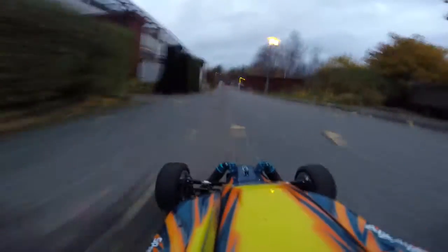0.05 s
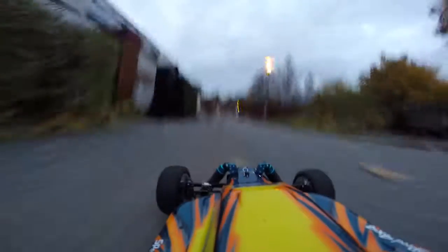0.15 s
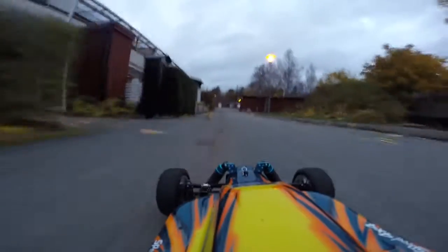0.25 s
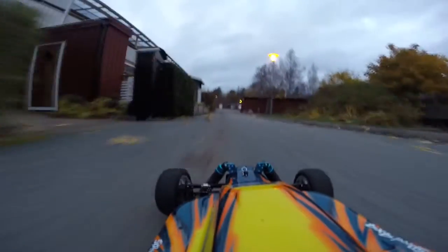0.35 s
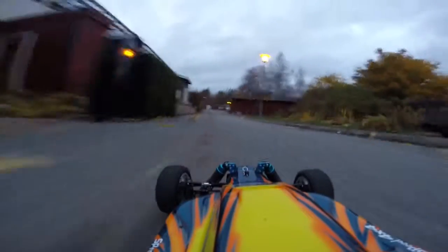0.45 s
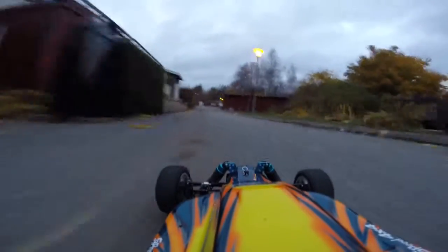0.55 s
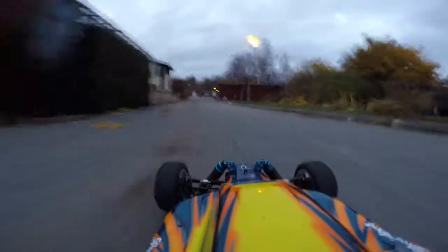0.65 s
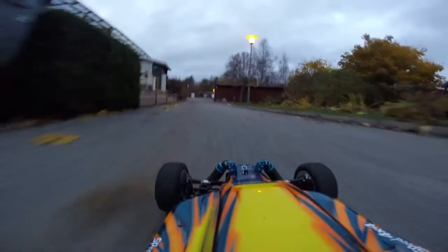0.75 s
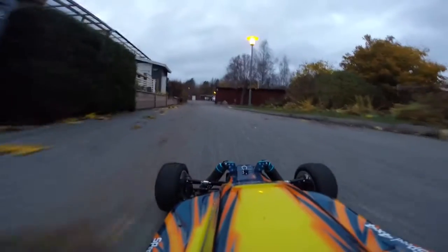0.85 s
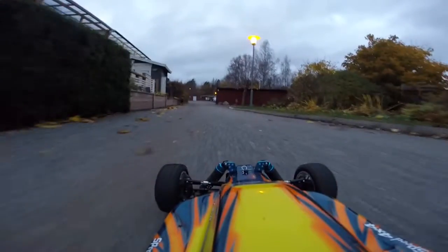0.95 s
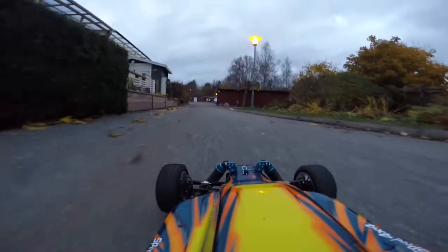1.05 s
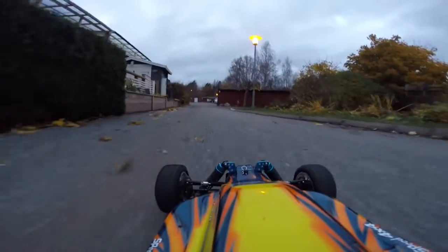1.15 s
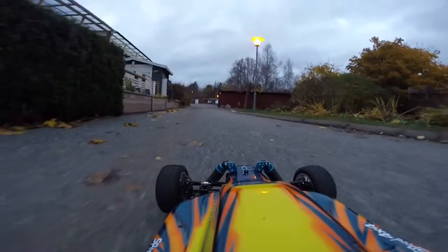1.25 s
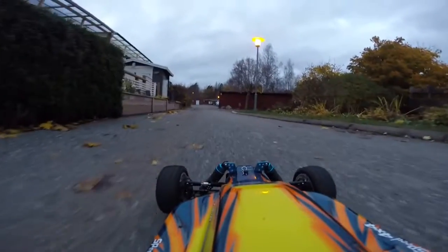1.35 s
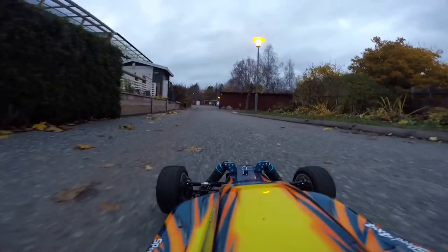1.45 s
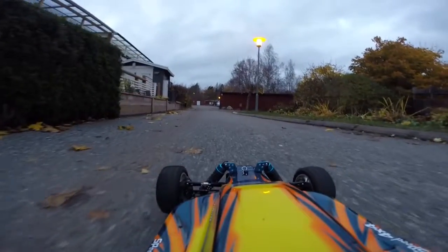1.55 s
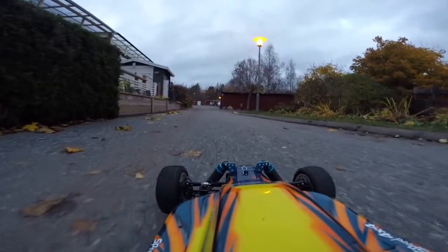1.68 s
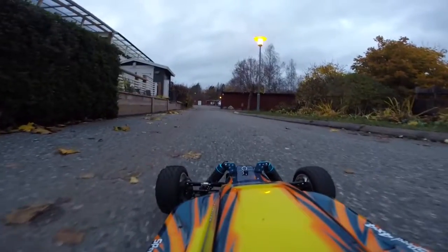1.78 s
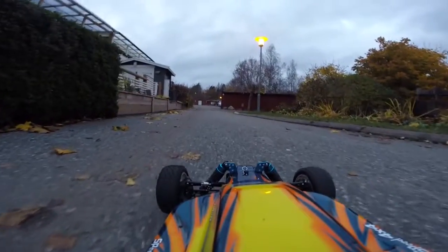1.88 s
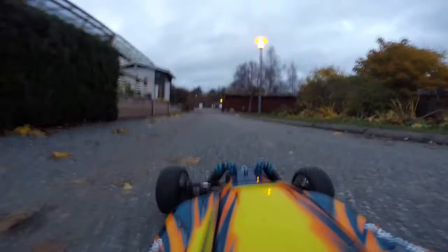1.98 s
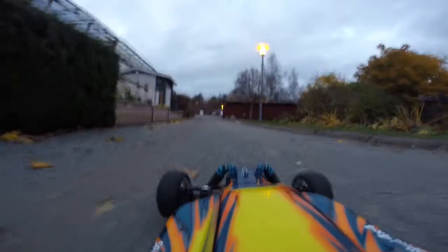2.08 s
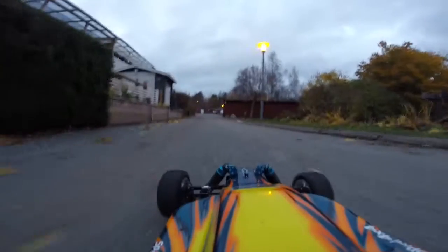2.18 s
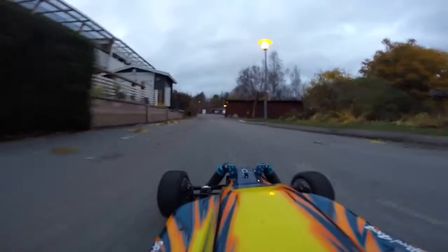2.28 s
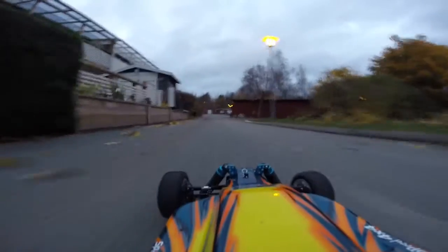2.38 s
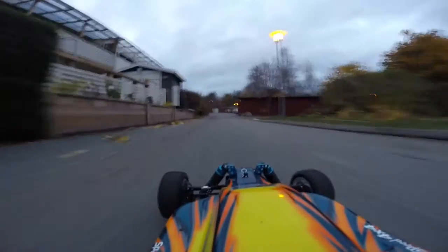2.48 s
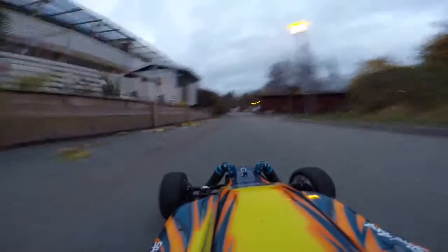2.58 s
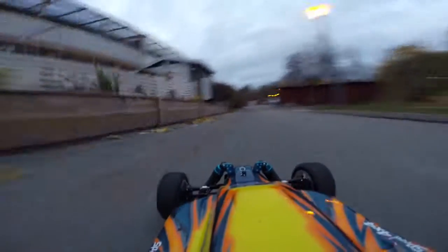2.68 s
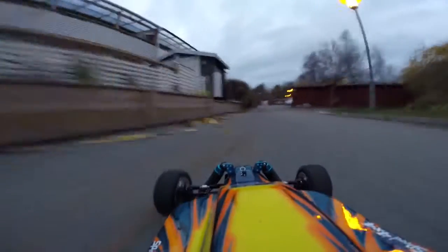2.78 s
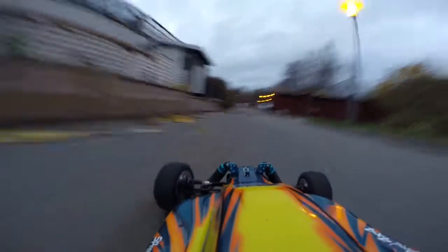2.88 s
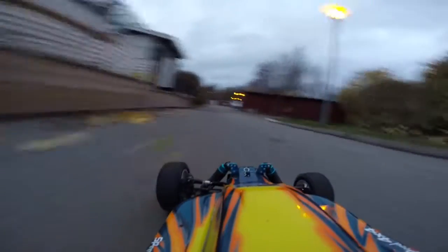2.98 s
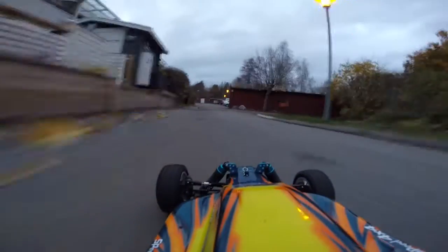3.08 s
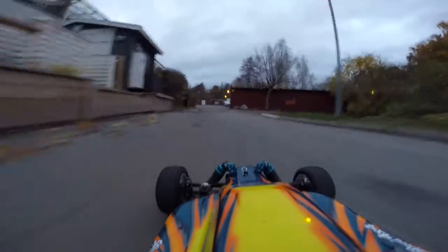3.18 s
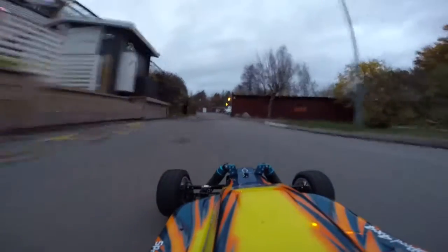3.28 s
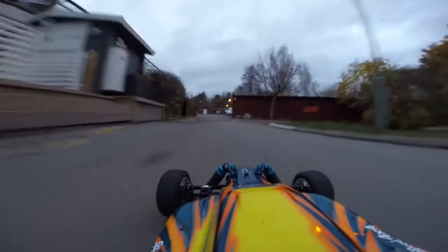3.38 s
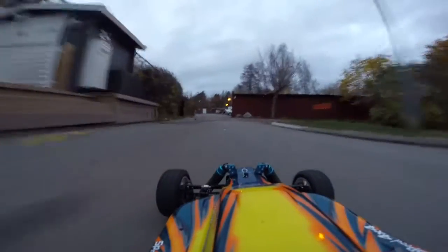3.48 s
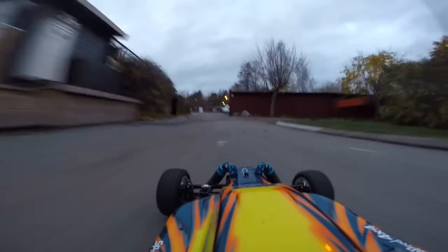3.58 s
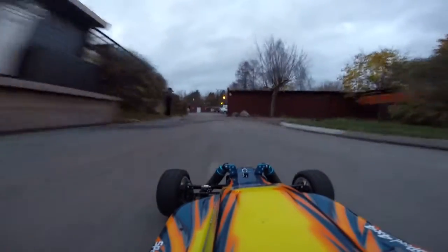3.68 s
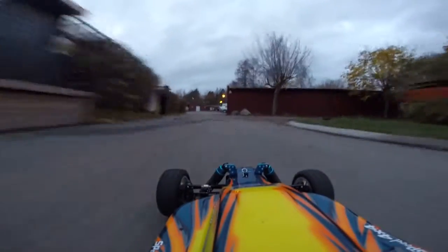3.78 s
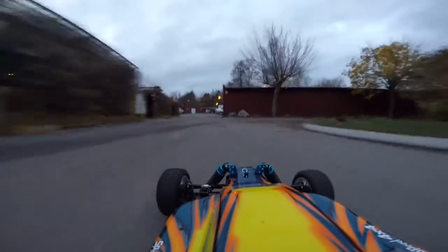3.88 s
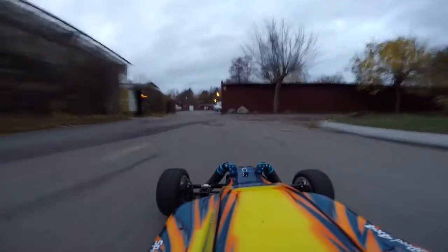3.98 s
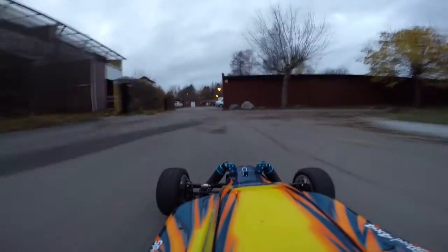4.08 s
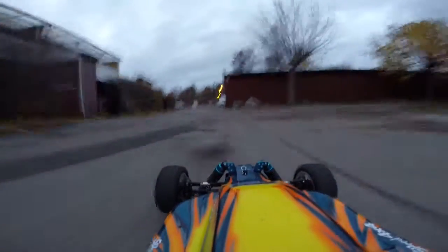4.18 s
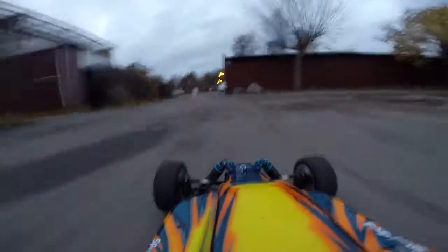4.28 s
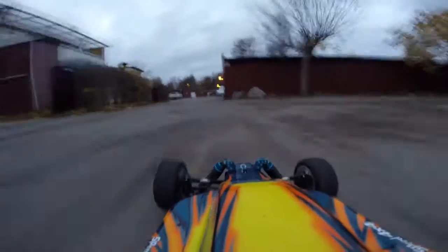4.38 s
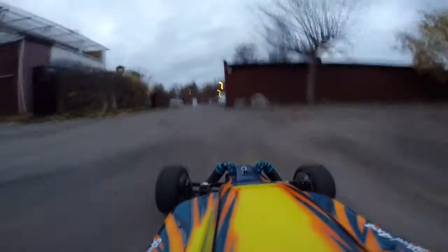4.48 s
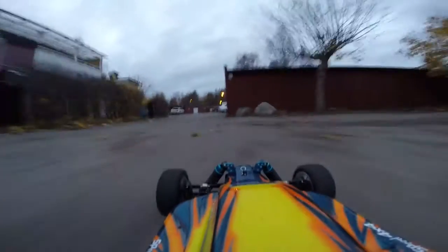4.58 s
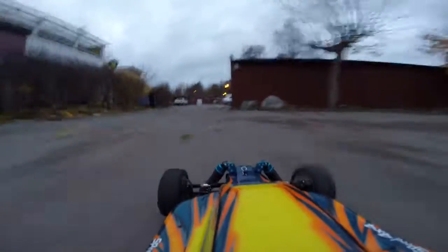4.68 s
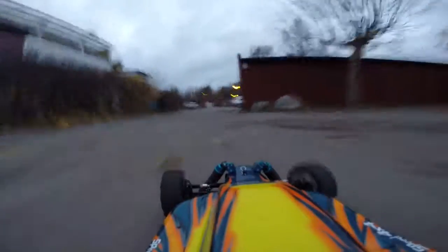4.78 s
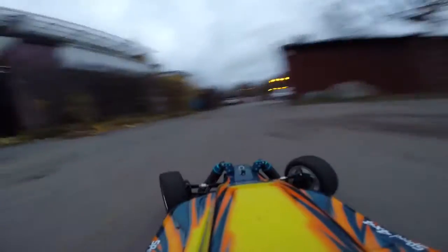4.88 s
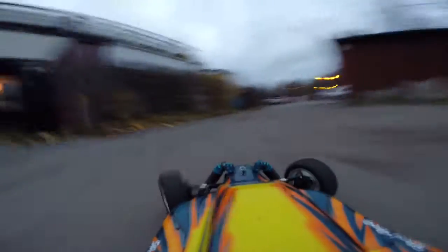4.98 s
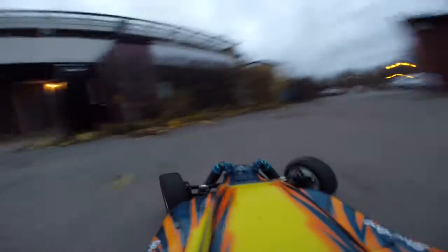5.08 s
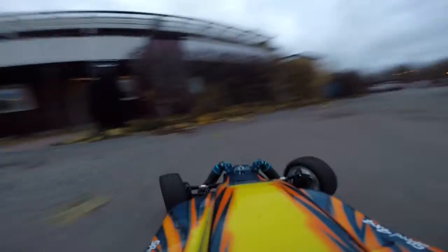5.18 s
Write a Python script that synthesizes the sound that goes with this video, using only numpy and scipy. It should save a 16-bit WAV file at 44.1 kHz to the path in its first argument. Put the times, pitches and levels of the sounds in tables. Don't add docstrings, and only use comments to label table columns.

```python
import sys
import numpy as np
from scipy import signal
from scipy.io import wavfile
from scipy.ndimage import uniform_filter1d, minimum_filter1d

SR = 44100
rng = np.random.default_rng(int(sys.argv[2]) if len(sys.argv) > 2 else 0)


def wrap_up_sound(samples):
    columns = np.atleast_2d(samples).T
    tamed = np.clip(columns, -1, 1)
    steps = np.round(tamed * 32767).astype(np.int16)
    wavfile.write(sys.argv[1], SR, steps)


def rack_gain(trim_db):
    fader = np.asarray(trim_db, float)
    return 10 ** (fader / 20)


N = 231260
T = np.arange(N) / SR

# t/s, chassis shaking level/dB, tyre grit (0-1)
RIDE = [(0, -10.5, 0.75), (.48, -11.5, 0.83), (.62, -12, 0.82), (.8, -15, 0.57), (1.22, -15.5, 0.1),
        (1.3, -27, 0), (1.885, -26, 0.05), (1.895, -14.5, 0.8), (1.94, -8, 0.3), (2.03, -16.5, 0.3),
        (2.12, -17, 0.34), (2.42, -13, .9), (2.65, -14.5, 0.83), (3.3, -13.5, 0.77), (3.8, -11, 0.8),
        (4.4, -11, 0.91), (4.48, -14, 0.85), (5.24, -13, 0.4)]
# t/s, switching tone level/dB, judder hiss level/dB
BRAKES = [
    [(0.54, -53, -18), (0.55, -27, -23), (0.854, -29, -31.5), (1.134, -26.5, -38.5), (1.23, -27.5, -33),
     (1.28, -30, -55)],
    [(4.15, -23, -26), (4.236, -30, -24), (4.412, -28.5, -22.5), (4.43, -41, -24)],
]


def evened(x):
    return x / np.sqrt(np.mean(x ** 2) + 1e-20)


def columns(rows, t):
    s, *cols = np.transpose(rows)
    return [np.interp(t, s, c) for c in cols]


def add(mix, s, sound):
    part = mix[round(s * SR):][:len(sound)]
    part += sound[:len(part)]


def span(rows, fade_s=0.024):
    t = np.arange(rows[0][0], rows[-1][0], 1 / SR)
    to_nearest_end = np.minimum(t - t[0], t[-1] - t)
    return t, np.clip(to_nearest_end / fade_s, 0, 1)


def swells(rows):
    return sum(db * np.exp(-((T - s) / length) ** 2) for s, db, length in rows)


def drift(hz, size=N):
    noise = rng.standard_normal(size + 4000)
    smooth = signal.lfilter(*signal.butter(2, hz, fs=SR), noise)
    return evened(smooth[4000:])


def resonate(x, hz, width):
    turn = np.exp(2j * np.pi * np.cumsum(hz * np.ones(len(x))) / SR)
    r = np.exp(-np.pi * width / SR)
    return 2 * (turn * signal.lfilter([1 - r], [1, -r], x / turn)).real


def causal(points, peaks=()):
    hz = abs(np.fft.fftfreq(8192, 1 / SR))
    f, db = np.transpose(points)
    db = np.interp(np.log(hz + 1), np.log(f + 1), db)
    db = db + sum(d / (1 + (2 * (hz - p) / w) ** 2) for p, w, d in peaks)
    log_level = np.log(rack_gain(np.maximum(db, -130)))
    spectrum = np.exp(np.conj(signal.hilbert(log_level)))
    taps = np.fft.ifft(spectrum).real[:4096] * np.hanning(8192)[4096:]
    return taps / np.linalg.norm(taps)


def whine(hz, db, fuzz=0.32, width=45):
    phase = 2 * np.pi * np.cumsum(hz * np.ones(len(db))) / SR + 6 * rng.random()
    line = np.sqrt(2) * np.sin(phase)
    halo = rng.standard_normal(len(db))
    for _ in range(3):
        halo = resonate(halo, hz, width)
    return rack_gain(db) * ((1 - fuzz) * line + fuzz * evened(halo))


def rumble():
    # f/Hz, level per Hz/dB
    rumble_colour = [(15, -16.5), (23, 7), (33, -7.5), (50, -6), (100, -8.5), (160, -10), (300, -16),
                     (500, -26.5), (1000, -67), (4000, -120)]
    # t/s, swell/dB, length/s
    bumps = [
        (.57, 12.5, 0.02),
        (1.6, 1, 0.061),
        (1.97, 20.5, 0.091),
        (2.98, 6, 0.18),
        (3.2, 4, 0.074),
        (4.29, 5, 0.016),
        (4.95, 11, 0.18),
        (5.22, 11, 0.15),
    ]
    grit = columns(RIDE, T)[1]
    level_db = -32 + 6.5 * (grit - 0.95) + swells(bumps)
    lumps = rng.standard_normal(N) * rack_gain(2.9 * drift(42))
    return rack_gain(level_db) * evened(signal.oaconvolve(lumps, causal(rumble_colour))[:N])


def hum():
    # t/s, level/dB
    fan_levels = [
        (.7, -47),
        (.9, -36.5),
        (1.22, -35.5),
        (1.31, -28),
        (1.87, -20),
        (1.91, -21),
        (1.93, -70),
    ]
    # t/s, swell/dB, length/s
    surges = [(.2, 5.5, 0.27), (.5, 5.5, 0.057), (2.05, 16.5, .03), (2.13, 13, 0.042), (2.45, 1, .1),
              (2.8, 8, 0.14), (2.97, 10, 0.076), (3.2, 7.5, 0.086), (3.87, 12, 0.22), (4.53, 13.5, 0.032),
              (4.95, 13, 0.24), (5.23, 17, 0.048)]
    fan_hz = 234.5 * (1 + 0.0026 * drift(8.0))
    fan = whine(fan_hz, columns(fan_levels, T)[0], fuzz=0.07, width=8.7)
    grit = columns(RIDE, T)[1]
    tray_db = -36.5 + 6.5 * (grit - .7) + swells(surges) + 0.66 * drift(8.1)
    tray_hz = 215 * (1 + 0.0151 * drift(1.907))
    return fan + whine(tray_hz, tray_db, fuzz=0.8, width=52.6)


def creep():
    # f/Hz, width/Hz, level/dB
    bands = [(806, 290, -51), (1565, 190, -37), (2102, 180, -32.5), (2624, 230, -49.5), (4870, 420, -58.5),
             (6140, 900, -62)]
    rock_hz, rock_db, fade_db = 8.6, 4, 1
    out = np.zeros(N)
    t, window = span([[1.26], [1.7]])
    db = rock_db * np.cos(2 * np.pi * rock_hz * (t - 1.42)) + fade_db * (t - t[0]) / (t[-1] - t[0])
    for f, width, band_db in bands:
        level_db = db + band_db + 3.3 * drift(25, len(t))
        add(out, t[0], window * whine(f, level_db, fuzz=0.83, width=width))
    return out


def motor():
    # t/s, f/Hz, level/dB
    shaft = [
        (3.35, 126.7, -38.5),
        (3.6, 155.6, -32.5),
        (3.9, 182.5, -30),
        (4, 182, -52),
    ]
    # start/s, end/s, f/Hz, width/Hz, level/dB
    howls = [
        (0, 0.508, 4910, 500, -38),
        (2.344, 2.465, 5740, 352, -38),
        (3.486, 3.95, 4910, 346, -36.5),
    ]
    # multiple of its pitch, level/dB
    switch_orders = [(1, 1.5), (2, 1.5), (3, -20.5), (4, -31.5), (5, -28)]
    # f/Hz, width/Hz, level/dB
    judder = [(2708, 420, 6), (5440, 1800, -18.5), (7970, 300, -27), (10500, 2000, -47.5)]
    switch_hz = 1016.3
    out = np.zeros(N)
    t, window = span(shaft)
    add(out, t[0], window * whine(*columns(shaft, t), fuzz=0.26, width=29))
    for start, end, hz, width, db in howls:
        t, window = span([[start], [end]], fade_s=0.047)
        add(out, start, window * whine(hz, db + 3.7 * drift(60, len(t)), fuzz=1, width=width))
    for rows in BRAKES:
        t, window = span(rows, fade_s=0.012)
        tone_db, hiss_db = columns(rows, t)
        tone = sum(whine(k * switch_hz, tone_db + db, fuzz=0.22, width=42) for k, db in switch_orders)
        judder_db = hiss_db - 8 + 2.5 * drift(120, len(t))
        hiss = sum(whine(f, judder_db + db, fuzz=0.9, width=w) for f, w, db in judder)
        add(out, t[0], window * (tone + hiss))
    return out


def gears():
    # start/s, end/s, first f/Hz, last f/Hz, bow of the glide/Hz
    stretches = [(0, 0.526, 446.4, 530, 18.5), (2.22, 2.621, 330, 797.7, 110),
                 (2.651, 3.144, 658.5, 549, 49.5), (3.14, 3.969, 575.7, 1197, 271),
                 (3.999, 4.16, 1098, 1135, 15), (4.432, 4.828, 700, 623, 29),
                 (4.79, 5.202, 638, 390, -60.5), (0.548, 1.087, 417, 115.8, -70),
                 (.84, 1.295, 215, 66.3, -65.5), (2.079, 2.442, 172, 616.5, -52),
                 (2.019, 2.248, 104.8, 362.3, 3)]
    multiples = [(1, 2, 3, 4.9), (1, 2, 3.3), (1, 2, 3), (1, 2, 4.9), (1, 2), (1, 2, 3), (1, 2, 3),
                 (2, 4.9), (9.8, 14.7), (4.9,), (1, 2)]
    order_db = [(-3, -0.5, -5, -1), (1, 0, -7.5), (-8.5, -0.5, -7.5), (-0.4, -4, 6), (-2.5, -0.5),
                (-8, -3.1, -14), (-6.5, -3, -11.5), (-10, -1), (-3.2, -8.5), (2,), (8.5, 1)]
    tilts = [-0.5, -0.5, 0, -1.5, -0.5, -1.5, -5.5, 4, 1, -5, -10.5]
    load_db = -17
    out = np.zeros(N)
    for stretch, ks, dbs, tilt_db in zip(stretches, multiples, order_db, tilts):
        start, end, first_hz, last_hz, bow = stretch
        t, window = span([[start], [end]])
        u = (t - start) / (end - start)
        hz = first_hz + (last_hz - first_hz) * u + bow * u * (1 - u)
        for k, db in zip(ks, dbs):
            flutter_db = 1.3 * drift(45, len(t)) - np.maximum(k * hz - 2200, 0) / 90
            level_db = load_db + db + tilt_db * (2 * u - 1) + flutter_db
            fuzz = np.clip(.27 + k * hz / 3600, 0, 1)
            tone = whine(k * hz, level_db, fuzz=fuzz, width=50 + 0.075 * k * hz.mean())
            add(out, t[0], window * tone)
    return out


def jolts():
    # t/s, peak/dB, length/s
    slaps = [(2.6387, -5.5, 0.0052), (2.7053, -5, 0.0038), (2.7607, 0, 0.0043), (2.815, -1.5, 0.0098),
             (2.8825, 2, 0.0026), (2.928, -13, 0.0037), (2.9477, 0, 0.0036), (3.002, 1, 0.0046),
             (3.0756, -4, 0.0078), (3.113, -2, 0.0076), (3.1385, -2, 0.006), (3.188, -4, 0.0092),
             (4.0156, -7.5, 0.002), (4.088, 2, 0.002), (4.119, -11.5, 0.0043), (4.15, 8, 0.002),
             (4.5278, -2, 0.0021), (4.5716, -6, 0.013), (4.628, -1, 0.0041), (4.698, 2.5, 0.0028),
             (4.751, -1, 0.0039), (4.8086, -0.5, 0.0041), (4.861, -6, 0.006), (4.8734, -2.5, 0.011),
             (4.915, 0, 0.0056), (4.941, -1.5, 0.014), (4.9965, -0.5, 0.0031), (5.019, -0.5, 0.0088),
             (5.079, -1, 0.002), (5.1096, 5, 0.002)]
    # t/s, peak/dB, length/s
    hops = [(0.014, -12, 0.0053), (0.095, -19, 0.0014), (0.245, -3.5, 0.0085), (0.29, -5, 0.0029),
            (0.4166, -8, 0.0018), (0.472, -5.5, 0.0092), (0.505, -4, 0.0047), (0.5247, -3, 0.0079),
            (0.588, -9, 0.0033), (0.617, -3, 0.004), (0.853, -8, 0.0082), (1.614, -17, 0.0025),
            (2.134, -1.5, 0.0083), (2.168, -15, 0.004), (2.318, -10.5, 0.0027), (2.352, -3.5, 0.0069),
            (2.42, -1.5, 0.004), (2.457, -3.5, 0.0019), (2.5117, -5, 0.0019), (2.595, -12.5, 0.0068),
            (2.8624, -3, 0.0032), (3.2683, 3.5, 0.0028), (3.3273, -17.5, 0.0013), (3.412, -6.5, 0.0031),
            (3.499, -5.5, 0.0031), (3.6875, -4, 0.004), (3.754, -13, 0.0013), (3.805, -7, 0.0021),
            (3.959, -13, 0.0017), (5.209, 2.5, 0.0036)]
    # t/s, depth/dB, length/s
    slack = [(.497, -17, 0.02), (1.957, -18, 0.013), (1.998, -19.5, 0.018), (2.626, -10, 0.031),
             (3.04, -8, .012), (4.003, -7.5, 0.02), (4.072, -3.5, 0.02), (4.108, -3.5, 0.0089),
             (4.137, -0.5, 0.0044), (4.46, -4, 0.018), (4.498, -4.5, 0.042), (4.728, -4, .013)]
    floats = [(s - 0.017, -4, 0.0085) for s, _, _ in slaps]
    level_db = columns(RIDE, T)[0] + swells(slack + floats)
    swell = np.zeros(N)
    for s, db, length in slaps + hops:
        u = np.arange(0, 6, 1 / (max(length, .002) * SR))
        add(swell, s - .001, rack_gain(db - 8.5) * np.minimum(u / 0.89, 1) * np.exp(-.25 * u ** 2))
    return rack_gain(level_db - 5), swell


def shaking():
    steady, swell = jolts()
    grit = rng.standard_normal(N) * rack_gain(1.66 * drift(300) + 1.83 * drift(76))
    press = (steady + 1.23 * swell) / uniform_filter1d(steady + 1.02 * swell, size=6000)
    return grit * steady + rng.standard_normal(N) * swell + rack_gain(-12) * press * gears()


def chassis():
    # f/Hz, level per Hz/dB
    shell = [(170, -23.5), (440, -18.5), (690, -11.5), (940, -15), (1500, 1), (2150, -3), (2650, -9),
             (3050, -23), (4800, -21.5), (7000, -30.5), (7500, -42), (11800, -49.5), (12300, -71.5),
             (13800, -62), (15200, -67.5), (16500, -110)]
    # f/Hz, width/Hz, height/dB
    panels = [(700, 310, 6), (1477, 465, 5), (2064, 340, 7), (2378, 69, -17), (2567, 410, 5.5),
              (3935, 100, -11), (4236, 72, 5.5), (4704, 194, 5), (5736, 160, 7), (6540, 50, -10),
              (9600, 300, 5.5)]
    # f/Hz, level per Hz/dB
    air_colour = [(200, -18), (320, -16.5), (470, -23.5), (650, -9), (830, -1.5), (1000, -39), (2150, -4),
                  (3000, -44.5), (4500, -55.5), (6300, -33), (7200, -58), (12000, -110)]
    # t/s, peak/dB, brightness/dB, thud/dB, knock/dB
    slams = [
        (0.5581, 30, -34, -14, -26),
        (1.8906, 13, -38, -55, -10),
        (1.929, -11.5, -28, -6, -10.5),
        (1.9367, -6, -22.5, -6, -33),
        (1.9673, 17, -22.5, -19, -10),
        (1.9814, -6, -26.5, -30, -40),
        (2.011, -1, -39.5, -1.5, -10),
        (2.02, -8, -29, -26, -22),
        (2.0462, -7, -30, -18, -21),
        (2.0772, -16, -36, -11, -18.5),
    ]
    ring = causal(shell, panels)
    split, top = (signal.butter(4, hz, "high", fs=SR, output="sos") for hz in (3200, 7300))
    grit = columns(RIDE, T)[1]
    bright_db = -7 + 12.5 * grit
    fizz_db = -8 + 12 * grit
    for rows, db in zip(BRAKES, (1.5, 4.5)):
        held = 1. * (T > rows[0][0]) * (T < rows[-1][0])
        fizz_db += db * uniform_filter1d(held, size=400)
    flicker_db = 0.7 * drift(8.1)
    bright_db, fizz_db = bright_db + flicker_db, fizz_db + 1.5 * flicker_db

    body = signal.oaconvolve(shaking(), ring)[:N]
    upper, fizz = signal.sosfiltfilt(split, body), signal.sosfiltfilt(top, body)
    body += (rack_gain(bright_db) - 1) * (upper - fizz) + (rack_gain(fizz_db) - 1) * fizz
    gusts = rng.standard_normal(N) * rack_gain(2.5 * drift(20))
    body += rack_gain(-33.5) * signal.oaconvolve(gusts, causal(air_colour))[:N]

    t = np.arange(0, .03, 1 / SR)
    size = len(t)
    for s, db, rel_db, thud_db, knock_db in slams:
        blow = rng.choice([-1., 1.], size) * np.exp(-t / 0.0014)
        crack = signal.oaconvolve(blow, ring)[:size]
        crack += rack_gain(rel_db + 14.5) * signal.sosfilt(split, crack)
        add(body, s, rack_gain(db) * crack)
        spit = signal.sosfilt(top, rng.standard_normal(size) * np.exp(-t / .001))
        add(body, s, rack_gain(db + rel_db - 21.5) * spit)
        add(body, s, rack_gain(thud_db - 11.0) * np.sin(2 * np.pi * 45 * t) * np.hanning(size))
        knock = whine(644, knock_db + 3.0 - 900 * t, fuzz=0.94, width=430)
        add(body, s, knock * np.minimum(t / 0.0057, 1) * np.hanning(2 * size)[size:])
    return body


def scene():
    return (rumble() + hum() + creep() + motor() + chassis())[None]


def low_pass(x):
    return signal.sosfilt(signal.butter(12, 15400, fs=SR, output="sos"), x)


def record(dry):
    room = minimum_filter1d(np.minimum(.985 / (abs(dry) + 1e-9), 1), size=181)
    held = dry * uniform_filter1d(room, size=91)
    return low_pass(held)


dry = scene()
out = record(dry)
wrap_up_sound(out)
```